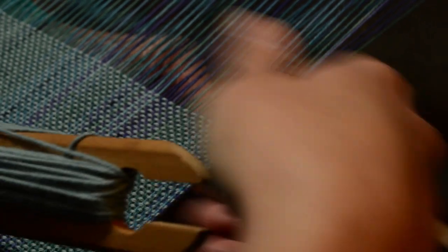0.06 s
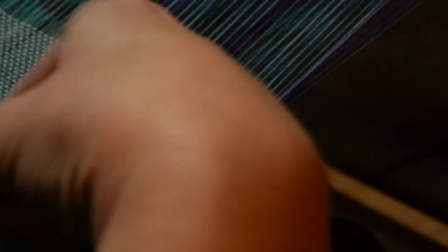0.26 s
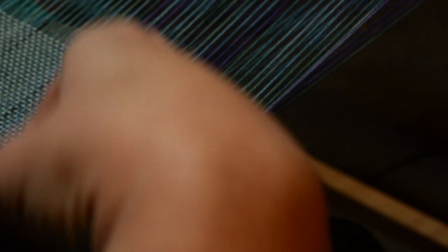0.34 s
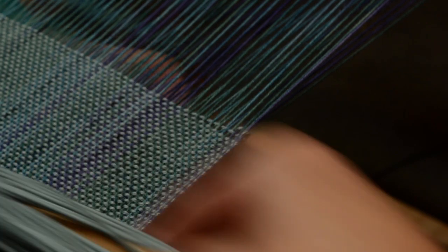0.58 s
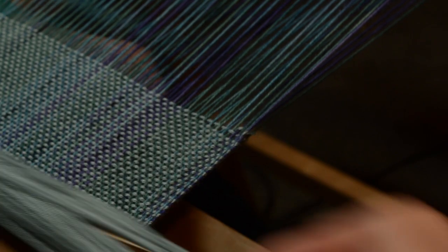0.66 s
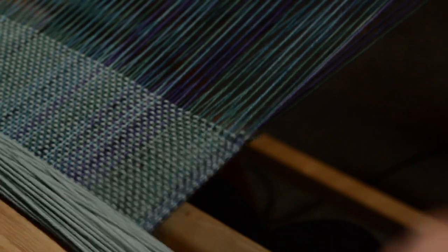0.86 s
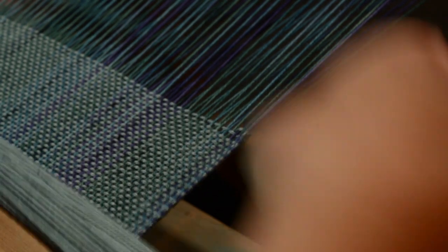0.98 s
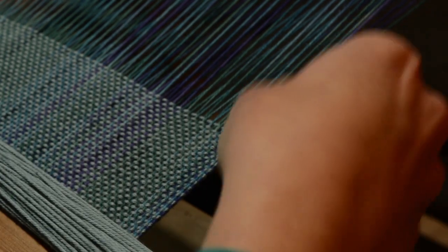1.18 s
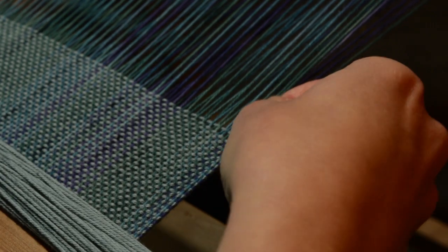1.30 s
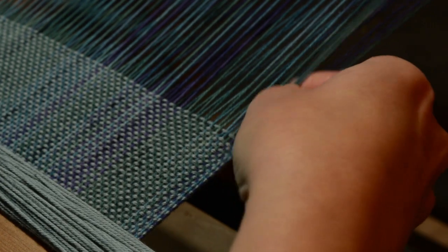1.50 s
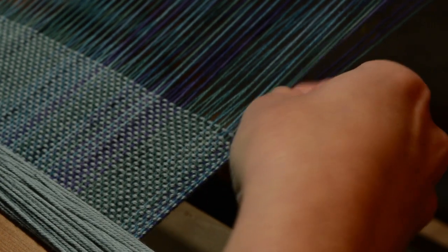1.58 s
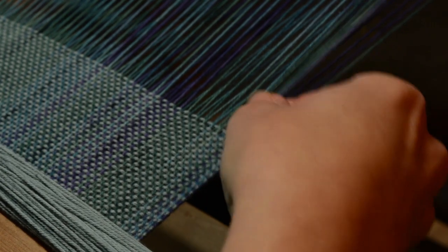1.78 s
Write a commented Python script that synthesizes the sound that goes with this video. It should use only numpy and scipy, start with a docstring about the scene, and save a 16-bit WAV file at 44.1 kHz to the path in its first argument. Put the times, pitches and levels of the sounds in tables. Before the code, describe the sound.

Close up in a small, quiet room, a wooden shuttle knocks once against a loom and scrapes along its frame. A light rasp of drawn yarn follows, with soft thuds on taut cloth and faint rubbing of threads.

```python
"""A wooden stick shuttle lands on a hand loom with one sharp knock, slides over the frame and catches.
Blows and stick-slip friction ring the same wood, with a dry hiss of grain on top. Then yarn is drawn
across the warp, a fine crackle of slipping fibres, and fingers rub the edge threads. Hands bump the
taut cloth into soft thuds over a low frame rumble and steady air, all close up in a small room."""
import sys
import numpy as np
from scipy import signal
from scipy.fft import rfft, irfft, next_fast_len
from scipy.io import wavfile

SR = 44100
rng = np.random.default_rng(int(sys.argv[2]) if len(sys.argv) > 2 else 0)


def output_pcm(signal):
    """Save a mono or channel-first signal as 16-bit PCM at the path in sys.argv[1].

    Samples are clipped to [-1, 1] before scaling.
    """
    pcm = np.clip(np.atleast_2d(signal).T, -1, 1) * 32767
    wavfile.write(sys.argv[1], SR, np.round(pcm).astype(np.int16))


N = 81585
T = np.arange(N) / SR

# modes of the shuttle on the frame: f/Hz, relative level/dB, t60/s
WOOD_MODES = [(271, -19.5, 0.041), (494, -19, 0.037), (974, -5.5, 0.011), (1262, -4, 0.012),
              (1050, -22.5, 0.069), (1420, -21, 0.019), (1765, -14, 0.038), (2200, -13.5, .022),
              (2796, -9.5, 0.022), (3377, -16.5, 0.034), (3970, -33, 0.027), (4720, -38, 0.017),
              (5170, -27.5, 0.012)]
# the landing, two bounces and the catch: t/s, force level/dB, contact/s
KNOCKS = [(.2331, 1.5, 0.000021), (.2498, -13, 0.000067), (.2628, -19, 0.00024), (.5778, -22, 0.000022)]
# wood on wood: t/s, attack/s, hold/s, release/s, level/dB, tilt/(dB/octave), relative hiss/dB
SLIDES = [(.112, 0.0084, 0.013, .15, -41, 8, -7), (0.242, 0.0078, 0.016, 0.14, -31.5, 1.5, -15),
          (0.284, 0.14, 0.03, .11, -28.5, -0.5, -9), (0.477, 0.048, 0.043, 0.24, -44, 8, -0.5),
          (0.575, 0.0082, 0.038, 0.082, -46, 3.5, 2)]
# tone of the sliding force: f/Hz, level/dB
FRICTION_EQ = [(150, 5), (330, 2), (490, 3.5), (700, 5), (1200, 6), (1700, -2), (2250, -7.5), (3000, 3),
               (4500, 15.5), (5600, -7), (8000, -8)]
# dry scratch of the grain: f/Hz, level/dB
GRAIN_EQ = [(200, -7), (700, 6), (1600, -26), (2000, 10.5), (4000, 7), (6000, -2.5), (9000, -6.5),
            (16000, -18.5)]
# how well the wood passes its motion to the air: f/Hz, level/dB
RADIATION_EQ = [(40, -6), (150, -5), (280, -1), (520, 2.5), (670, -4), (880, 1), (16000, -5.5)]
# the shuttle tip catches: t/s, attack/s, hold/s, release/s, level/dB
CATCH = [(.5755, 0.0022, 0.03, 0.025, -29)]
# rasp of the tip: f/Hz, level/dB
CATCH_EQ = [(100, -31), (260, -5), (420, -11.5), (680, -9.5), (930, 6), (1150, -6), (1320, -1),
            (2100, -1.5), (2450, -9.5), (3250, -2), (3700, -18), (4100, -10), (4750, -3.5), (6000, -20),
            (8500, -23.5), (16000, -39)]

# swell of the yarn drawn over the warp: t/s, level/dB
DRAW_ENVELOPE = [(.54, -77), (.64, -43), (.69, -48.5), (.745, -46), (.81, -48), (.85, -45.5), (.89, -44.5),
                 (.908, -50), (.945, -50.5), (.962, -57.5)]
# tone of the drawn yarn: f/Hz, level/dB
DRAW_EQ = [(200, -3), (400, -5), (750, -7.5), (1600, -3), (2400, -5), (3500, -4.5), (4700, -13),
           (5300, -15), (8000, -14), (11000, -18), (16000, -21.5)]
# the weft zips around the edge thread: t/s, attack/s, hold/s, release/s, level/dB
ZIP = [(.80, 0.043, 0.052, .05, -45)]
# bite of the zip: f/Hz, level/dB
ZIP_EQ = [(800, -19), (1600, -15), (2400, 5), (3000, -2), (3500, 7.5), (4100, 1), (4650, 6), (5300, -21),
          (16000, -30)]
# fibres snag as the yarn comes taut: t/s, attack/s, hold/s, release/s, level/dB
SNAGS = [(.86, 0.013, 0.0079, 0.085, -44.5), (.905, .014, 0.0032, .025, -46.5),
         (.938, 0.007, 0.0041, 0.009, -54)]
# crisp top of the snags: f/Hz, level/dB
SNAG_EQ = [(1000, -38), (3500, 0), (7500, 4), (11000, -2), (16000, -5.5)]
# fingers rub the edge threads: t/s, attack/s, hold/s, release/s, level/dB
RUBS = [(1.17, 0.092, 0.016, 0.17, -58.5), (1.36, 0.042, 0.016, 0.12, -53), (1.47, 0.03, 0.04, 0.033, -50),
        (1.565, 0.027, .11, 0.09, -48)]
# tone of the rubs: f/Hz, level/dB
RUB_EQ = [(100, -19.5), (340, 2.5), (700, -10.5), (1100, -7.5), (1550, -5), (1750, -7.5), (2200, 4.5),
          (2600, -5), (3200, 3.5), (3700, -14), (4300, -7.5), (5800, -27), (8000, -12), (10000, -22.5),
          (16000, -24)]

# soft hand bumps on the cloth: t/s, force level/dB, contact/s
BUMPS = [(.025, -36.5, 0.00089), (.291, -23.5, 0.0013), (.729, -34, 0.00014), (.779, -26.5, 0.0015),
         (.787, -32, 0.0039), (1.051, -25, 0.0006), (1.081, -18.5, 0.0024)]
# modes of the taut cloth and its beam: f/Hz, relative level/dB, t60/s
CLOTH_MODES = [(67.6, -14.5, 0.073), (111, -3, 0.071), (159, -10, 0.061), (280, -7, 0.043),
               (403, -7.5, 0.035), (575, -7, 0.031), (1480, -11, .03)]
# swell of the frame rumble: t/s, level/dB
RUMBLE_ENVELOPE = [(0, -57.5), (.25, -50.5), (.6, -53.5), (.8, -47), (.92, -48.5), (1.0, -52.5),
                   (1.17, -54), (1.45, -50.5), (1.7, -59.5), (1.85, -60)]
# low weight of the rumble: f/Hz, level/dB
RUMBLE_EQ = [(20, -46), (60, -0.5), (110, -13), (190, -15), (380, -15.5), (700, -24.5), (2000, -53.5)]
# steady room tone: f/Hz, level/dB
AIR_EQ = [(12, -73), (20, -8.5), (116, -4.5), (172, -15), (216, -20.5), (422, -23), (849, -22.5),
          (1060, -25.5), (1370, -23), (1530, -20.5), (1960, -28), (3340, -24), (4180, -31.5), (9670, -35),
          (16000, -34.5)]
# tone of the reflections: f/Hz, level/dB
ROOM_EQ = [(60, 16), (220, 6), (600, 4), (1200, -5), (2000, 0.5), (3400, -10), (6000, -4), (16000, -5)]

STROKE_RANGE_DB = 37.5  # rise over one attack time, fall over one release time


def shuttle():
    """Knocks and sliding friction ring the same wood; the grain hisses and the tip rasps once."""
    tick = undb(-40) * decay(t60=0.0077) * noise(GRAIN_EQ)  # crisp edge of each knock
    wood = ring(WOOD_MODES)
    body = through(blows(KNOCKS), wood + tick)
    scratch = strokes(CATCH) * crackle(CATCH_EQ, per_s=1500, scatter_db=3)
    for start, attack, hold, release, db, tilt, hiss_db in SLIDES:
        friction = slips(per_s=2200, scatter_db=3)
        pressure = undb(db) * stroke(start, attack, hold, release)
        ringing = eq(through(friction, wood), FRICTION_EQ)
        tilted = eq(ringing, [(425, 0), (3400, 3 * tilt)])  # three octaves
        hiss = eq(friction + rng.standard_normal(N), GRAIN_EQ)
        body += pressure * unit(tilted)
        scratch += pressure * undb(hiss_db) * unit(hiss)
    return eq(body, RADIATION_EQ) + scratch


def yarn():
    """Fibres catch and slip as the weft is drawn tight and the fingers settle the edge."""
    draw = envelope(DRAW_ENVELOPE) * crackle(DRAW_EQ, per_s=9000, scatter_db=3.2)
    zipping = strokes(ZIP) * crackle(ZIP_EQ, per_s=5000, scatter_db=3.4)
    snags = strokes(SNAGS) * crackle(SNAG_EQ, per_s=6900, scatter_db=1.9)
    rubs = strokes(RUBS) * crackle(RUB_EQ, per_s=6000, scatter_db=3.3)
    return draw + zipping + snags + rubs


def cloth():
    """The taut cloth and its beam thud under the hand."""
    return through(blows(BUMPS), ring(CLOTH_MODES))


def frame_rumble():
    """The handled frame gives a low rumble that swells and sinks."""
    return envelope(RUMBLE_ENVELOPE) * noise(RUMBLE_EQ)


def air():
    """A faint, steady bed of room tone."""
    return undb(-55.5) * noise(AIR_EQ)


def room(x):
    """Add quick reflections off the loom itself and the short tail of the room."""
    onset = np.clip(T / 0.0036 - .5, 0, 1)  # reflections fade in just behind the direct sound
    response = np.zeros(N)
    for t60, db in ((0.054, -28), (0.31, -14.5)):  # loom, room
        tail = noise(ROOM_EQ) * decay(t60) * onset
        response += undb(db) * tail / np.sqrt(np.sum(tail ** 2))
    return x + through(x, response)


def ring(modes):
    """Impulse response of a set of modes; neighbours swing in opposite senses."""
    return sum((-1) ** k * undb(db) * decay(t60) * np.sin(2 * np.pi * hz * T)
               for k, (hz, db, t60) in enumerate(modes))


def blows(rows):
    """One smooth push for each blow; a longer contact is duller."""
    force = np.zeros(N)
    for at, db, contact in rows:
        push = np.exp(-.5 * ((T - at) / max(contact, 1 / SR)) ** 2)
        force += undb(db) * push / push.sum()
    return force


def slips(per_s, scatter_db):
    """Tiny stick-slip clicks, random in time and size."""
    hits = rng.random(N) < per_s / SR
    sizes = undb(scatter_db * np.clip(rng.standard_normal(N), -2, 2))
    return unit(hits * sizes * rng.choice([-1, 1], N))


def crackle(points, per_s, scatter_db):
    """Friction texture: equalised stick-slip clicks at rms 1."""
    return unit(eq(slips(per_s, scatter_db), points))


def noise(points):
    """Equalised noise at rms 1."""
    return unit(eq(rng.standard_normal(N), points))


def stroke(start, attack, hold, release):
    """Gain of one gesture: swells, holds and dies away, straight in dB."""
    before_peak = np.maximum((start + attack - T) / attack, 0)
    after_hold = np.maximum((T - start - attack - hold) / release, 0)
    return undb(-STROKE_RANGE_DB * (before_peak + after_hold))


def strokes(rows):
    """Summed gain of several gestures."""
    return sum(undb(db) * stroke(*timing) for *timing, db in rows)


def envelope(points):
    """Gain ride through points of t/s, level/dB."""
    return undb(np.interp(T, *np.array(points).T))


def decay(t60):
    """Exponential fall, 60 dB in t60 seconds."""
    return np.exp(-np.log(1000) * T / t60)


def eq(x, points):
    """Minimum-phase equaliser through points of f/Hz, level/dB."""
    hz, db = np.array(points, float).T
    size = 2 * next_fast_len(N)
    f = np.maximum(np.fft.rfftfreq(size, 1 / SR), 1)
    gain = undb(np.interp(np.log(f), np.log(hz), db))
    cepstrum = irfft(np.log(gain))
    cepstrum[1:size // 2] *= 2  # fold forward so nothing rings ahead of a hit
    cepstrum[size // 2 + 1:] = 0
    return irfft(rfft(x, size) * np.exp(rfft(cepstrum)))[:N]


def through(x, response):
    """Pass a sound through an impulse response."""
    return signal.fftconvolve(x, response)[:N]


def undb(db):
    """Decibels to gain."""
    return 10 ** (np.asarray(db) / 20)


def unit(x):
    """Scale to rms 1."""
    return x / np.sqrt(np.mean(x ** 2))


def scene():
    """Mono mix: shuttle and yarn with reverb; cloth, rumble and air left dry."""
    bed = air()
    return (room(shuttle() + yarn()) + cloth() + frame_rumble() + bed)[None]


def record(dry):
    """A steep high cut takes off the very top."""
    cutoff_hz = 15900
    return signal.sosfilt(signal.ellip(10, .1, 70, cutoff_hz, fs=SR, output="sos"), dry)


dry = scene()
out = record(dry)
output_pcm(out)
```